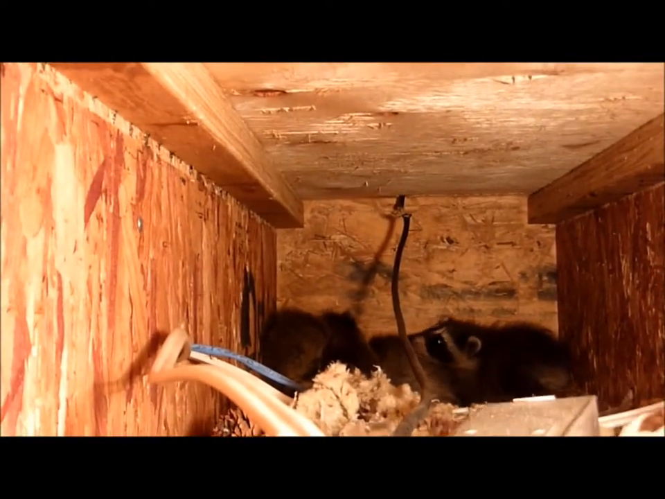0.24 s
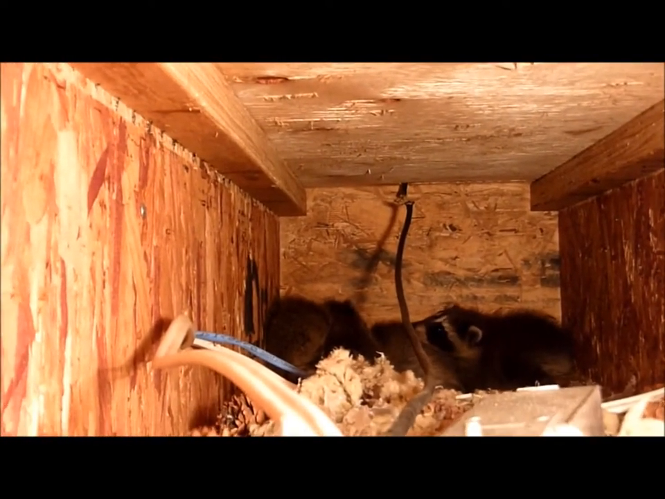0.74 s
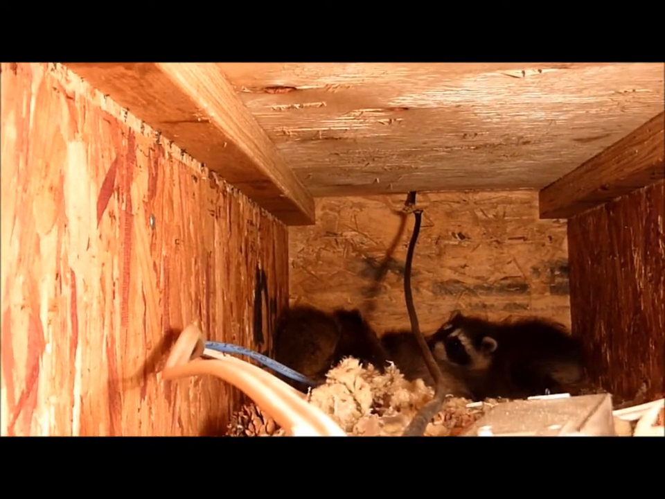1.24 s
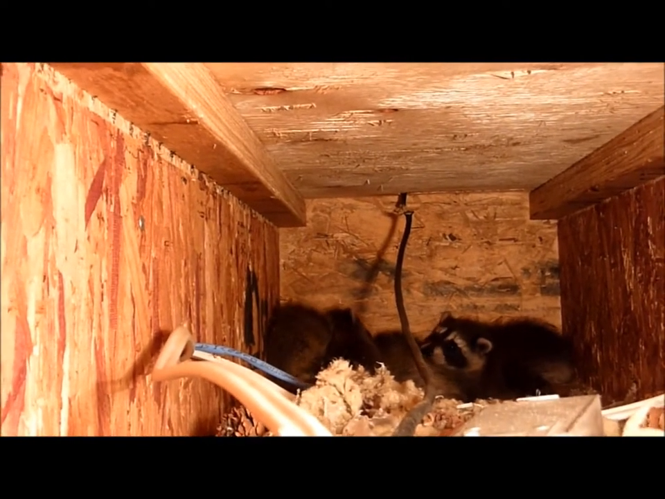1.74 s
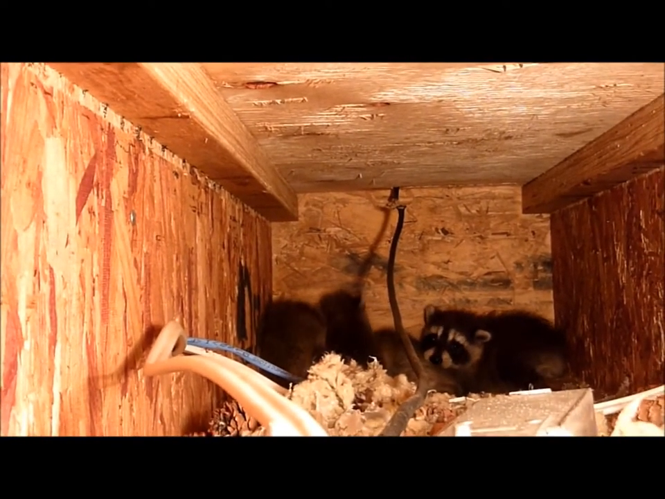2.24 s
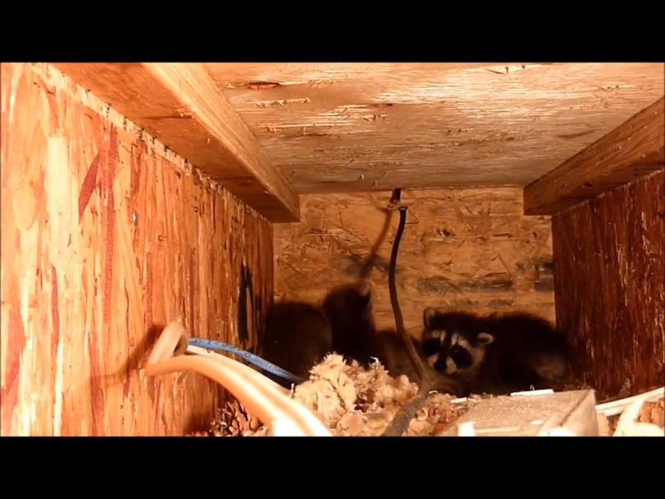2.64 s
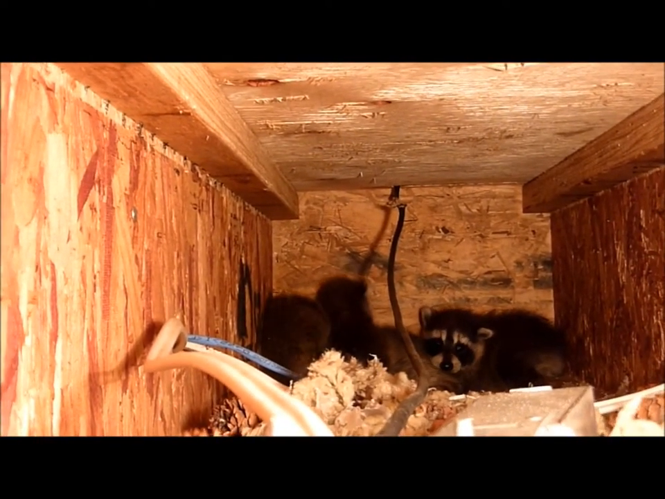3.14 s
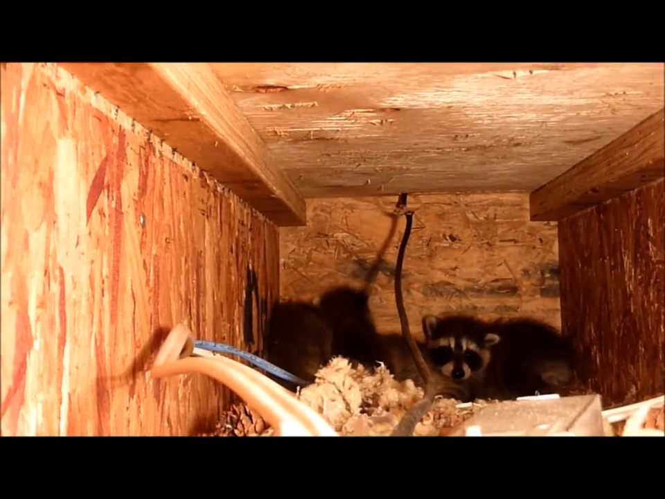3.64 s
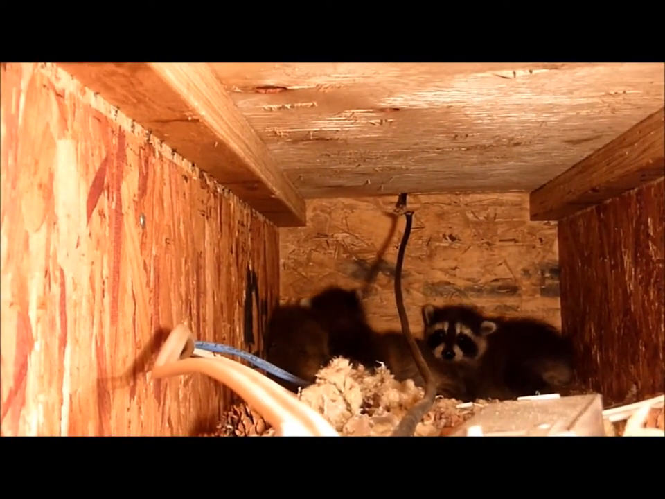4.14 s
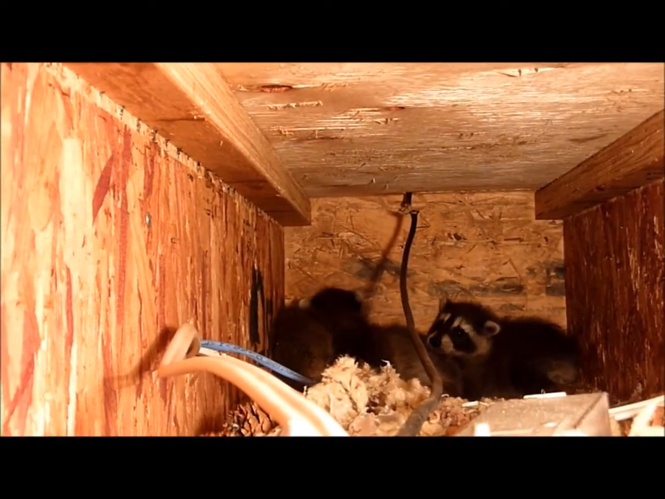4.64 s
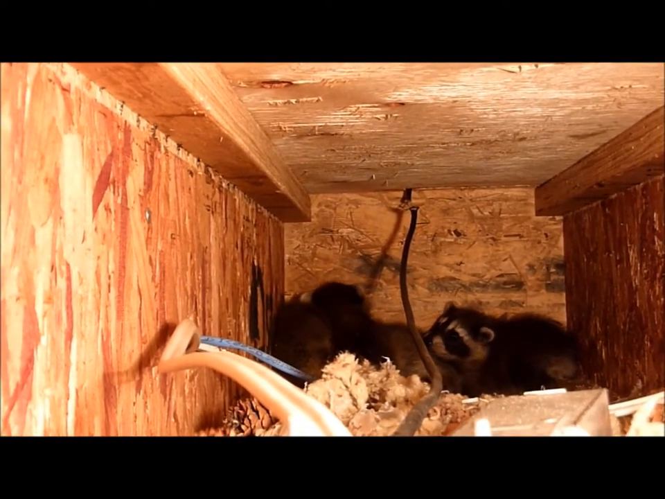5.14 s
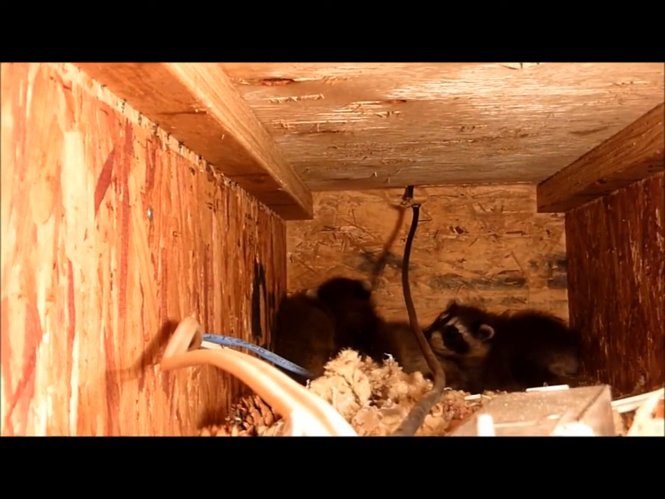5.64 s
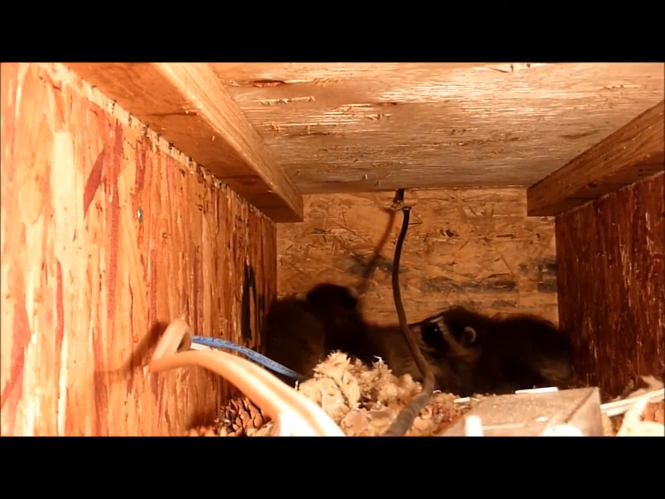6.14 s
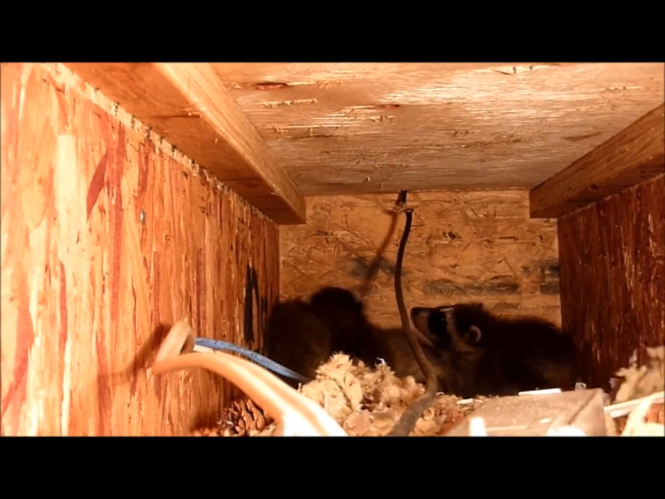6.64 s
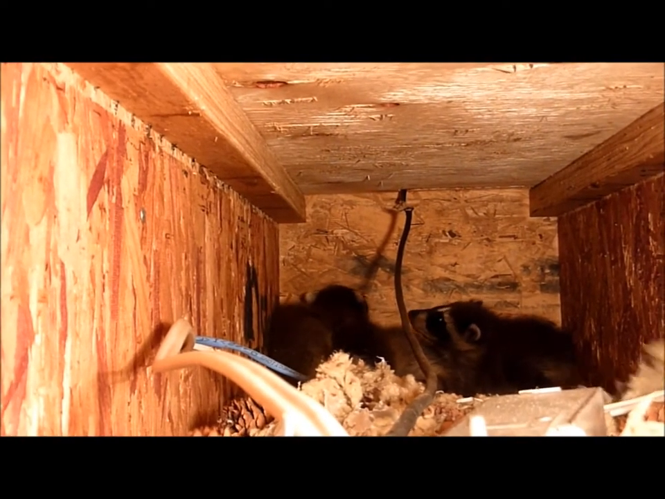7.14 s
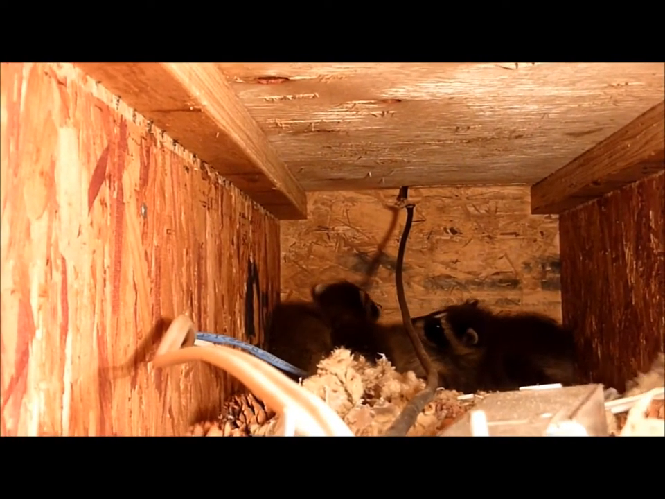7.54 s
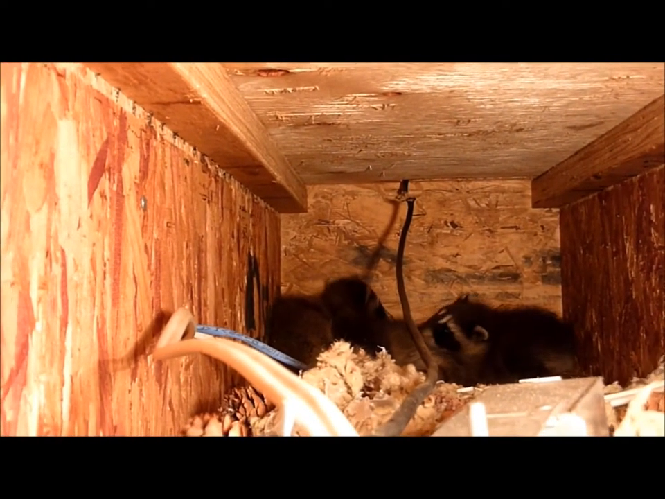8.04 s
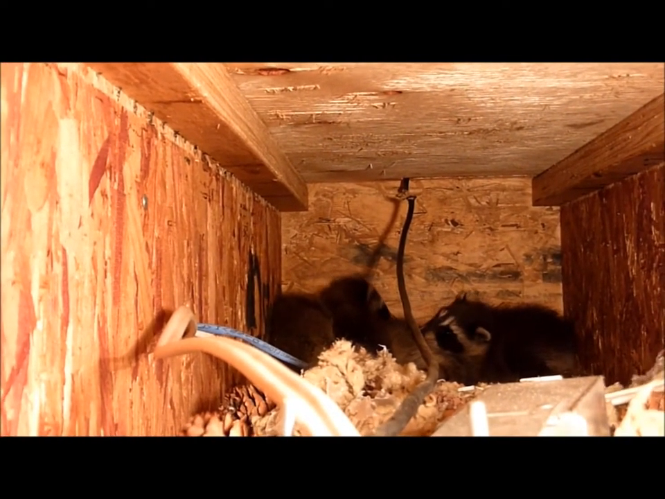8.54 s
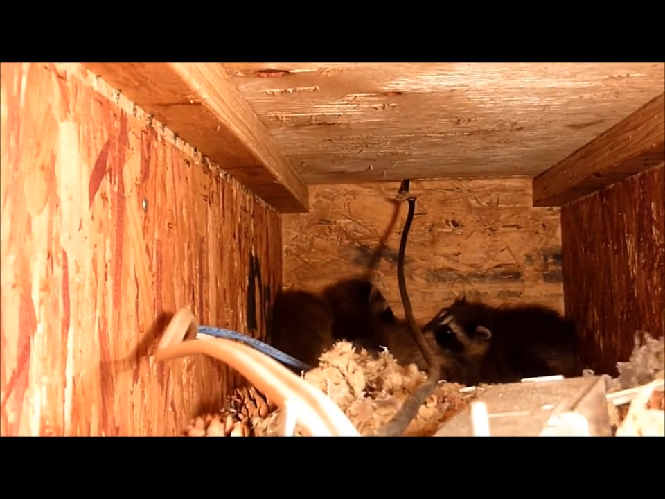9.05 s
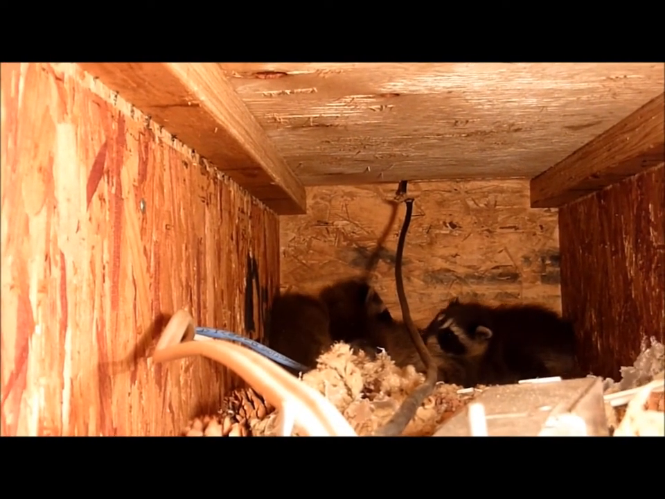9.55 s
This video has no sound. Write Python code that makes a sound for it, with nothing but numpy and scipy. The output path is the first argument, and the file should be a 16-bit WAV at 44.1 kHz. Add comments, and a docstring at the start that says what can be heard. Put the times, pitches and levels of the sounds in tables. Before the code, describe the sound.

Young raccoons churr in a fast pulsing growl, low hoots wrapped in throaty rasp, close by inside a small hollow wooden cavity.

```python
"""Young raccoons growl in a plywood ceiling cavity, six or seven short churrs a second, a metre from the microphone.
Each churr is air rasping through a fluttering throat (noise chopped by uneven slaps), with a nearly pure
low hoot (a sine with faint overtones) arching up and down inside it. The boards thud softly as low sines,
claws crack the dry litter as short resonant noise bursts, and the house rumbles faintly as shaped noise.
The narrow wooden box colours the animals with its modes and echoes, spread over two microphone ports."""
import sys
import numpy as np
from scipy import signal
from scipy.fft import rfft, irfft, next_fast_len
from scipy.io import wavfile

SR = 44100
rng = np.random.default_rng(int(sys.argv[2]) if len(sys.argv) > 2 else 0)


def store_wav(level_fs):
    """Save 16-bit WAV to argv[1]."""
    pcm = np.round(np.clip(np.atleast_2d(level_fs), -1, 1) * 32767)
    wavfile.write(sys.argv[1], SR, pcm.T.astype(np.int16))


N = 431738


def undb(db):
    """Decibels to gain."""
    return 10 ** (np.asarray(db) / 20)


def unit(x):
    """Scale to rms 1."""
    return x / np.sqrt(np.mean(x ** 2))


def add(track, start_s, sound):
    """Mix a sound into a track, trimming whatever falls outside it."""
    i = int(start_s * SR)
    sound, i = sound[max(-i, 0):], max(i, 0)
    track[i:i + len(sound)] += sound[:max(N - i, 0)]


def noise():
    """White noise for the whole scene, rms near 1."""
    return rng.standard_normal(N)


def colour(x, points):
    """Filter a steady signal by a (Hz, dB) curve, falling 20 dB an octave beyond its ends; rms 1."""
    hz, db = np.transpose(points)
    size = next_fast_len(N)
    f = np.maximum(np.arange(size // 2 + 1) * SR / size, 1)
    octaves_outside = np.abs(np.log2(f / np.clip(f, hz[0], hz[-1])))
    gain = undb(np.interp(np.log(f), np.log(hz), db) - 20 * octaves_outside)
    return unit(irfft(rfft(x, size) * gain, size)[:N])


def resonance(x, hz, width_hz):
    """Two-pole band-pass, gain 1 at the centre."""
    return signal.lfilter(*signal.iirpeak(hz, hz / width_hz, SR), x)


def walk(rate_hz):
    """Random drift, spread near 1, heading for a new value rate_hz times a second."""
    steps = rng.standard_normal(8192)
    return 1.2 * np.interp(np.arange(N) / SR * rate_hz, np.arange(len(steps)), steps)


def smoothed(push, time_s):
    """One-pole smoothing: a push builds late and ebbs away exponentially."""
    keep = np.exp(-1 / (time_s * SR))
    return signal.lfilter([1 - keep], [1, -keep], push)


def swell(length_s, fullness, trail_s):
    """A push that builds, peaks near mid-way and trails off; more fullness narrows the peak."""
    t = np.arange(int((length_s + .06) * SR)) / SR
    push = np.sin(np.pi * np.minimum(t / length_s, 1)).clip(0) ** fullness
    return smoothed(push, trail_s)


# colour of the still house: hz [Hz], level_db [dB, relative]
HOUSE_COLOUR = [(25, -5.5), (60, -1.5), (150, 4), (300, -3.5), (600, -9), (1300, -20), (2600, -20),
                (4000, -25.5), (7000, -32), (8000, -41.5)]


def house(level_db=-52, side_hiss_db=-27, swell_db=2.5):
    """Faint, slowly swelling rumble of the building, with a thin separate hiss on each side."""
    rumble = colour(noise(), HOUSE_COLOUR) * undb(swell_db * walk(9))
    return undb(level_db) * (rumble + undb(side_hiss_db) * rng.standard_normal((2, N)))


# soft low thuds of the boards: time_s [s, near the peak], level_db [dB, before the swell],
# pitch_hz [Hz, before the waver]
BOARD_THUDS = [(0.072, -14, 51.8), (0.167, -18.5, 47.7), (0.37, -12.5, 76.9), (0.908, -19.5, 70),
               (1.2, -12, 108.6), (1.492, -17.5, 87), (1.595, -23, 52), (1.769, -22, 60.5),
               (1.89, -18.5, 45.7), (2.508, -24.5, 58.9), (2.815, -22, 55.3), (4.707, -25.5, 52.3),
               (5.251, -16.5, 110.2), (7.925, -25, 91.5), (8.93, -21.5, 78.5), (9.186, -20, 107.7)]


def thuds(length_s=0.11, tremble_db=-36, tremble_db_per_s=70, tremble_lead_s=0.054, tremble_hz=57, waver=.3):
    """The boards boom at each jolt and tremble with every churr, more with a long one."""
    jolts, tremble = np.zeros((2, N))
    # the boards swing at a steady size but an ever-changing rate
    turns_at_1_hz = np.cumsum(np.exp(waver * walk(70))) / SR
    for time_s, level_db, pitch_hz in BOARD_THUDS:
        push = undb(level_db) * swell(length_s, fullness=1.3, trail_s=0.0044)
        here = (int(time_s * SR) + np.arange(len(push))) % N
        boom = np.sqrt(2) * push * np.sin(2 * np.pi * pitch_hz * turns_at_1_hz[here])
        add(jolts, time_s - .55 * length_s, boom)
    for catch_s, span_s, *_ in CHURR_LIST:
        size = undb(tremble_db + tremble_db_per_s * (span_s - USUAL_S))
        start_s = catch_s - LEAD_SHARE * span_s - tremble_lead_s
        add(tremble, start_s, size * swell(span_s + tremble_lead_s, fullness=1.0, trail_s=0.0082))
    rumble = colour(noise(), [(22, -14.5), (50, -0.5), (105, -2.5), (160, -17.0)])
    shaking = np.sin(2 * np.pi * tremble_hz * turns_at_1_hz) + 0.68 * rumble
    return jolts + tremble * shaking


# an ordinary churr, from which the others differ
USUAL_S, USUAL_RASP_DB, USUAL_HOOT_DB, USUAL_HZ = .13, -35, -11, 220
LEAD_SHARE = 0.31  # share of a churr's length when air alone sounds, before the hoot catches
# churrs: catch_s [s, the hoot catches], length_s [s], rasp_db [dB, before the swell and rasp gain],
# hoot_db [dB, before the swell], pitch_hz [Hz, top of the arch before scoop and wobble]
CHURR_LIST = [(0.058, 0.16, -26.5, -11, 196), (0.215, 0.12, -25, -12.5, 235.7),
              (0.361, 0.12, -30, -14.5, 220.4), (0.9, 0.13, -33.5, -18.5, 232.5),
              (1.047, 0.13, -33, -26.5, 188.0), (1.18, 0.17, -36, -10, 177),
              (1.355, 0.15, -33, -12.5, 236.7), (1.485, 0.15, -32.5, -9.5, 235.6),
              (1.627, 0.13, -33.0, -11, 231.8), (1.77, 0.17, -34.5, -10, 205.8),
              (1.918, 0.16, -34.0, -10, 235.9), (2.066, 0.15, -38, -9.0, 244),
              (2.233, 0.17, -37, -10.5, 152.6), (2.395, 0.15, -35, -10, 189), (2.533, 0.14, -34, -9.0, 241),
              (2.693, 0.15, -37.5, -8.0, 225), (2.845, 0.17, -35.5, -7.5, 234.2),
              (2.993, 0.17, -41.5, -7.5, 221), (3.158, 0.16, -35.5, -6.5, 239.4),
              (3.295, 0.14, -40, -9, 230.8), (3.457, 0.16, -36.5, -10, 213.3), (3.599, 0.11, -39, -6, 225),
              (3.757, 0.14, -36.5, -8.5, 247.0), (3.906, 0.15, -38.5, -6.5, 217.5),
              (4.077, 0.13, -32, -11, 211), (4.222, 0.17, -39, -9.0, 183), (4.413, 0.15, -38, -18, 245.5),
              (4.708, 0.13, -36, -12.0, 191.4), (4.989, 0.12, -30.5, -12.5, 282.2),
              (5.24, 0.14, -33.5, -12, 206.2), (5.394, 0.12, -32, -9, 216.2),
              (5.503, 0.091, -34, -4, 230.6), (5.646, 0.092, -36, -10, 247.5),
              (5.758, 0.15, -35, -8, 217.8), (5.898, 0.11, -31, -8, 269.6), (6.019, 0.14, -34, -7.5, 270),
              (6.156, 0.12, -35.5, -10.0, 228.6), (6.285, 0.12, -33, -9, 241),
              (6.417, 0.11, -33.5, -11, 233.6), (6.544, 0.1, -36.5, -6.5, 213.5),
              (6.683, 0.1245, -34, -8.5, 273.3), (6.815, 0.14, -35, -7.5, 221.0),
              (6.962, 0.12, -34, -9.5, 249.6), (7.085, 0.11, -37.5, -8, 224.0),
              (7.221, 0.11, -35, -10, 265.4), (7.356, 0.14, -36, -11.0, 220),
              (7.507, 0.14, -35, -15, 222.7), (7.64, 0.088, -35.5, -8, 257.5), (7.779, 0.13, -35, -14, 205),
              (7.935, 0.16, -38, -20.5, 193.5), (8.106, 0.076, -38, -21, 251), (8.3, 0.13, -36, -17, 190),
              (8.446, 0.17, -30, -8.5, 215.3), (8.606, 0.12, -29.5, -12, 183.7),
              (8.789, 0.13, -32.5, -13, 225), (8.92, 0.099, -32, -8.5, 206.6), (9.067, 0.1, -32, -11, 214),
              (9.189, 0.11, -33, -12.0, 207.3), (9.325, 0.13, -34.5, -17, 214.3),
              (9.466, 0.14, -30.5, -13, 207.3), (9.61, 0.033, -49.5, -43, 209)]
# slow change of the hiss as the growl goes on: time_s [s], level_db [dB, added]
HISS_OVER_TIME = [(0, 1), (1.5, 1.3), (3.7, -1.3), (5.2, 1.5), (6.8, -0.6), (8.5, 0.1), (9.6, 1.5)]


def pushes(shove_db=-16, shove_s=0.02, air_lead_s=0.0022):
    """Drive of rattle, rasp and hiss: one swell each per churr, begun before the hoot catches."""
    rattle, rasp, hiss = np.zeros((3, N))
    drift_s, drift_db = np.transpose(HISS_OVER_TIME)
    for catch_s, length_s, rasp_db, hoot_db, pitch_hz in CHURR_LIST:
        start_s = catch_s - LEAD_SHARE * length_s
        # the rattle follows the rasp in part and changes a little with the pitch
        rattle_db = -20 + 0.27 * (rasp_db - USUAL_RASP_DB) + 0.0016 * (pitch_hz - USUAL_HZ)
        # a strong hoot uses up the air that would hiss
        hiss_db = rasp_db - 19 - .34 * (hoot_db - USUAL_HOOT_DB)
        hiss_db += np.interp(catch_s, drift_s, drift_db)
        add(rattle, start_s, undb(rattle_db) * swell(length_s, fullness=0.93, trail_s=.006))
        add(rasp, start_s - air_lead_s, undb(rasp_db) * swell(length_s, fullness=1.09, trail_s=0.008))
        add(hiss, start_s - air_lead_s, undb(hiss_db) * swell(length_s, fullness=0.93, trail_s=.004))
        # the throat gives an extra shove as each hoot catches
        extra_db = (hoot_db + rasp_db) / 2 + shove_db
        add(rasp, catch_s, undb(extra_db) * swell(shove_s, fullness=0.91, trail_s=0.0044))
    return rattle, rasp, hiss


def flutter(rate_hz, jitter, scatter_db):
    """Slack throat folds slap unevenly: the slaps, and the puff of air that follows each."""
    turns = np.cumsum(rate_hz * np.exp(jitter * walk(rate_hz))) / SR
    cycle = turns.astype(int)
    sizes = undb(scatter_db * np.clip(rng.standard_normal(8192), -2, 2))
    size = sizes[cycle % 8192]
    slaps = size * (np.diff(cycle, prepend=0) > 0)
    puffs = unit(size * np.exp(-(turns % 1) / 0.88))
    return slaps, puffs


# mouth resonances that come and go as the jaw moves:
# hz [Hz], width_hz [Hz, of each of two passes], level_db [dB, before mouth_db]
MOUTH_RESONANCES = [(674, 310, -12.5), (1316, 300, -22.5), (2600, 830, -28)]


def mouth_air(mouth_db=-0.5, jaw_db=4.5):
    """Noise through each mouth resonance twice, its level wandering with the jaw."""
    out = np.zeros(N)
    for hz, width_hz, level_db in MOUTH_RESONANCES:
        ringing = resonance(resonance(noise(), hz, width_hz), hz, width_hz)
        out += undb(level_db + mouth_db + jaw_db * walk(5.8)) * unit(ringing)
    return out


# colours of the throat's rattle, rasp and hiss: hz [Hz], level_db [dB, relative]
RATTLE_COLOUR = [(25, -23), (50, -15), (85, -12), (115, 0.5), (150, -0.5), (185, -6), (250, 3),
                 (300, -14.5), (380, -24.5), (600, -49)]
RASP_COLOUR = [(200, -11), (300, 7), (380, 7.5), (470, 6.5), (540, 1.5), (620, 1), (780, -7.5),
               (950, -11.5), (1250, -10), (1520, -20), (1850, -21), (2200, -28.5), (3200, -48.5)]
HISS_COLOUR = [(1500, -24.5), (2100, -4.5), (2520, -1), (3100, -4), (3500, -6), (4500, -8), (5100, -5.5),
               (6000, -11.5), (7000, -13), (7600, -20.5)]


def rasps(rattle_db=-2, rasp_db=2.5, hiss_db=-1, gating=0.46, linger_db=-13, hiss_linger_db=-17, grumble_db=-5):
    """The slaps rattle low in the throat and chop the air into a rasp and a hiss."""
    rattle_push, rasp_push, hiss_push = pushes()
    # the air comes in uneven surges
    surge = undb(1.7 * walk(40))
    rasp_push, hiss_push = rasp_push * surge, hiss_push * surge
    # the throat never quite stills between two close churrs: some air and a low grumble go on
    idle_rattle, idle_rasp, idle_hiss = [
        smoothed(push, time_s=0.055) * undb(2 * walk(25)) for push in (rattle_push, rasp_push, hiss_push)]
    rasp_push = np.hypot(rasp_push, undb(linger_db) * idle_rasp)
    hiss_push = np.hypot(hiss_push, undb(hiss_linger_db) * idle_hiss)
    low_air = colour(noise(), [(85, -23), (115, -3), (145, 1), (175, -10.5), (260, -20)])
    grumble = undb(grumble_db) * idle_rattle * low_air
    slaps, puffs = flutter(rate_hz=149.86, jitter=.35, scatter_db=4.0)
    air = unit((1 - gating + gating * puffs) * noise())
    slaps = unit(slaps - slaps.mean())
    rattle = undb(rattle_db) * rattle_push * colour(slaps + 0.63 * air, RATTLE_COLOUR)
    rasp = undb(rasp_db) * rasp_push * colour(air + .4 * slaps, RASP_COLOUR)
    hiss = undb(hiss_db) * hiss_push * colour(air + 0.13 * slaps, HISS_COLOUR)
    return grumble + rattle + rasp + hiss + rasp_push * mouth_air()


def hoot_swell(t, hold_s, attack_s=0.013, sag_s=0.093, release_s=0.024):
    """The folds catch quickly, sag as the air runs out, then let go."""
    rise = np.sin(np.pi / 2 * np.clip(t / attack_s, 0, 1)) ** 2
    return rise * np.exp(-np.minimum(t, hold_s) / sag_s - np.maximum(t - hold_s, 0) / release_s)


def hoots(rest_hz=135, jitter=0.02, wander=.015, shimmer_db=1.48, throb_db=1.5):
    """Nearly pure tones arch in pitch with the push of air; overtones strengthen with a hard push."""
    out, t = np.zeros(N), np.arange(int(.22 * SR)) / SR
    wobble = 1 + jitter * walk(200) + wander * walk(45)
    shimmer = undb(shimmer_db * walk(150) + throb_db * walk(50))
    for catch_s, length_s, rasp_db, hoot_db, pitch_hz in CHURR_LIST:
        here = (int(catch_s * SR) + np.arange(len(t))) % N
        # the pitch crests shortly after the catch, later in a long churr
        crest_s = 0.03713 + 0.19 * (length_s - USUAL_S)
        arch = np.exp(-((t - crest_s) / (0.3526 * length_s)) ** 2)
        hz = rest_hz + (pitch_hz - rest_hz) * arch
        # the folds start slack, 16 % low, and scoop up into the hoot
        scoop = 1 - 0.16 * np.exp(-t / .008)
        phase = 2 * np.pi * np.cumsum(hz * scoop * wobble[here]) / SR
        push = hoot_swell(t, hold_s=0.44 * length_s)
        # a harder rasp or hoot presses the folds and raises the overtones
        pressed = undb(0.69 * (rasp_db - USUAL_RASP_DB) + 0.46 * (hoot_db - USUAL_HOOT_DB))
        overtones = sum(undb(db) * np.sin(k * phase) for k, db in [(2, -22), (3, -31), (4, -41)])
        tone = np.sin(phase) + pressed * push * overtones
        add(out, catch_s, np.sqrt(2) * undb(hoot_db) * push * shimmer[here] * tone)
    return out


# claws on dry litter: start_s [s], peak_db [dB, before gain_db],
# brightness_db [dB, tilt per two octaves above the lowest litter mode]
CLAW_SCRATCHES = [(1.4393, -31.5, 1), (1.621, -35, -13), (1.786, -31, -8.5), (1.9923, -35.5, -13),
                  (2.0717, -35.5, -13), (3.7328, -34.5, -12.5), (8.0106, -37.5, -4), (8.403, -33.5, -10.5),
                  (8.611, -27, 0), (8.633, -28, -5), (8.6563, -22, 10), (8.672, -30.5, -15),
                  (8.9187, -25, -16), (9.7434, -48, -19)]
# ring of the litter: hz [Hz], width_hz [Hz], level_db [dB, before the tilt]
LITTER_MODES = [(2010, 440, -3.5), (3000, 920, 2), (4900, 820, -5.5), (6260, 510, -3.5), (6430, 260, -3)]


def scratches(decay_s=0.0024, gain_db=-1):
    """Tiny cracks ring the dry litter; a sharper claw favours the high modes."""
    out, t = np.zeros(N), np.arange(1024) / SR
    lowest_hz = LITTER_MODES[0][0]
    for start_s, peak_db, brightness_db in CLAW_SCRATCHES:
        burst = rng.standard_normal(len(t)) * np.exp(-t / decay_s)
        crack = np.zeros(len(t))
        for hz, width_hz, level_db in LITTER_MODES:
            tilt_db = brightness_db * np.log2(hz / lowest_hz) / 2
            crack += undb(level_db + tilt_db) * resonance(burst, hz, width_hz)
        add(out, start_s, undb(peak_db + gain_db) * crack / np.abs(crack).max())
    return out


def echoed(x, delay_ms):
    """The sound, late by so many milliseconds."""
    return np.pad(x, (round(delay_ms * SR / 1000), 0))[:N]


def reflections(x, t60_s):
    """Dense random echoes dying by 60 dB in t60_s, with a total energy of 1."""
    t = np.arange(SR // 2) / SR
    echoes = rng.standard_normal(len(t)) * np.exp(-np.log(1000) * t / t60_s)
    return signal.fftconvolve(x, echoes / np.linalg.norm(echoes))[:N]


def high_pass(x, hz, order):
    """Butterworth filter that removes the lows."""
    return signal.lfilter(*signal.butter(order, hz, "high", fs=SR), x)


# hollow of the cavity between the joists, one row: hz [Hz], width_hz [Hz], level_db [dB]
CAVITY_HOLLOW = (135, 22, -11.5)
# modes of the plywood box: hz [Hz], width_hz [Hz], level_db [dB, before box_db]
BOX_MODES = [(450.3, 41.4, -4), (814, 46, -5.5), (1350, 170, -14.5), (1614, 29, -2.5), (2060, 45, -15),
             (2420, 110, -10), (3000, 24, -11.5), (3830, 110, -10), (4000, 55, -13), (4530, 52, -13)]
# echoes from the nearest boards: delay_ms [ms], gain [factor, signed]
BOARD_ECHOES = [(1.11, -0.055), (1.49, -0.075), (1.83, -0.098), (2.47, 0.093)]
# board echoes reaching the two ports with opposite sign: delay_ms [ms], level_db [dB, before high-pass]
SIDE_ECHOES = [(1.1, -5.5), (2.7, -5.5)]


def cavity(x, box_db=1, scatter_db=-7, room_db=-23, slap_db=-5.0):
    """The box rings and slaps back, boards echo the treble differently to each port, the room rings faintly."""
    hz, width_hz, level_db = CAVITY_HOLLOW
    boxed = x + undb(level_db) * resonance(x, hz, width_hz)
    for hz, width_hz, level_db in BOX_MODES:
        boxed += undb(level_db + box_db) * resonance(x, hz, width_hz)
    slap = high_pass(reflections(boxed, t60_s=.055), hz=600, order=2)
    near = sum(gain * echoed(boxed, delay_ms) for delay_ms, gain in BOARD_ECHOES)
    room = reflections(boxed, t60_s=.6)
    mid = boxed + near + undb(slap_db) * slap + undb(room_db) * room
    side = sum(undb(level_db) * echoed(boxed, delay_ms) for delay_ms, level_db in SIDE_ECHOES)
    side = side + undb(scatter_db) * reflections(boxed, t60_s=.12)
    # long waves reach both ports alike
    side = high_pass(high_pass(side, hz=3800, order=1), hz=430, order=2)
    return np.array([mid + side, mid - side])


def scene():
    """The animals in their box, with the faint sound of the house."""
    animals = thuds() + rasps() + hoots() + scratches()
    return house() + cavity(animals)


def record(dry):
    """The microphone's housing notches the treble, the tallest peaks clip and the top is cut."""
    notched = signal.lfilter(*signal.iirnotch(5390, 7.3, SR), dry)  # Hz, quality
    clipped = np.clip(notched, -1, 1)
    # 8th order, 0.3 dB ripple, 70 dB down beyond 7500 Hz
    top_cut = signal.ellip(8, .3, 70, 7500, fs=SR, output="sos")
    return signal.sosfilt(top_cut, clipped)


dry = scene()
out = record(dry)
store_wav(out)
```